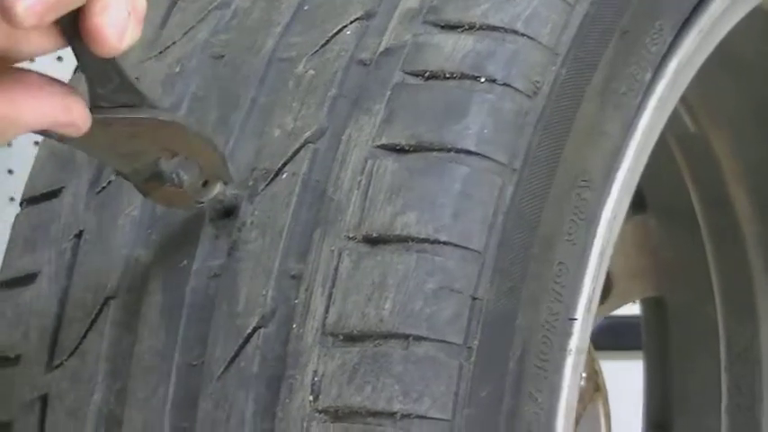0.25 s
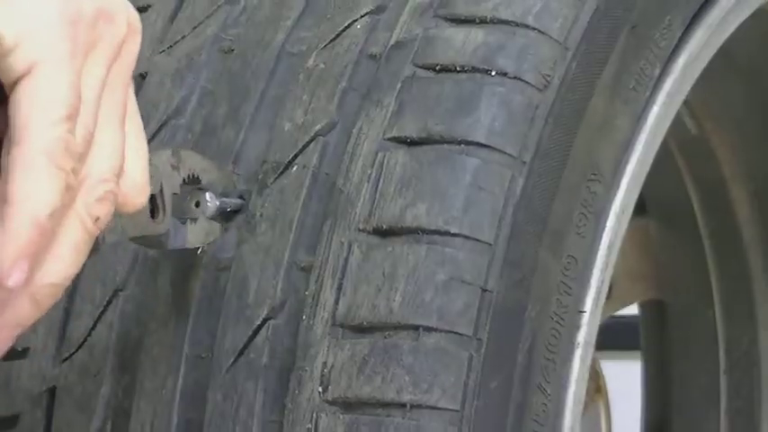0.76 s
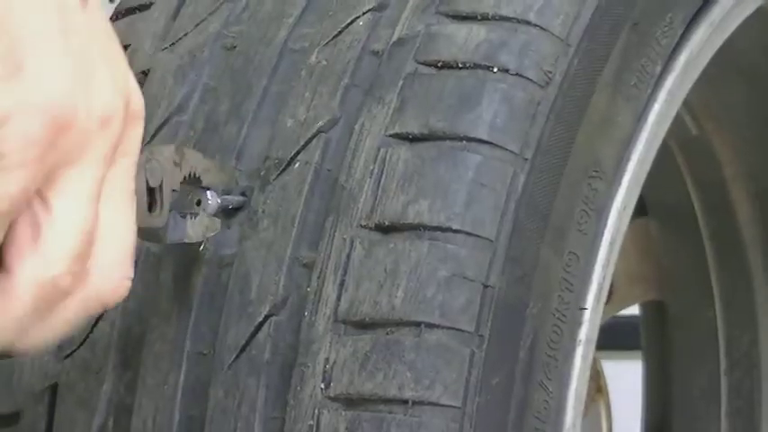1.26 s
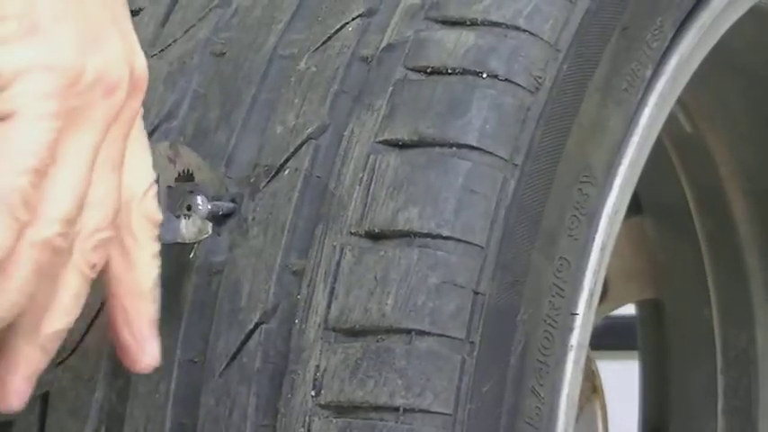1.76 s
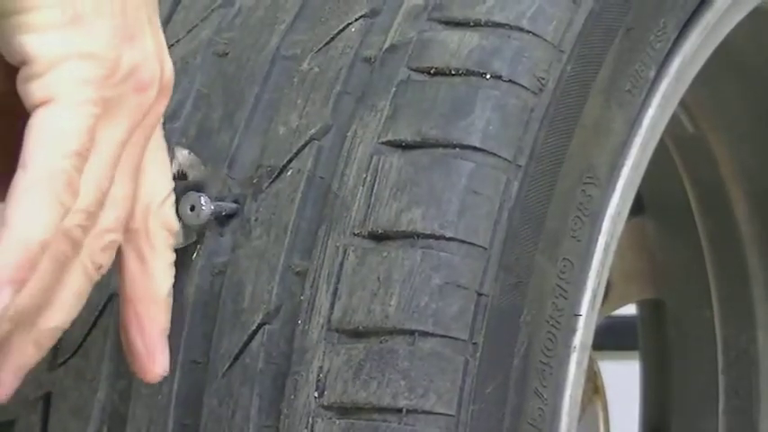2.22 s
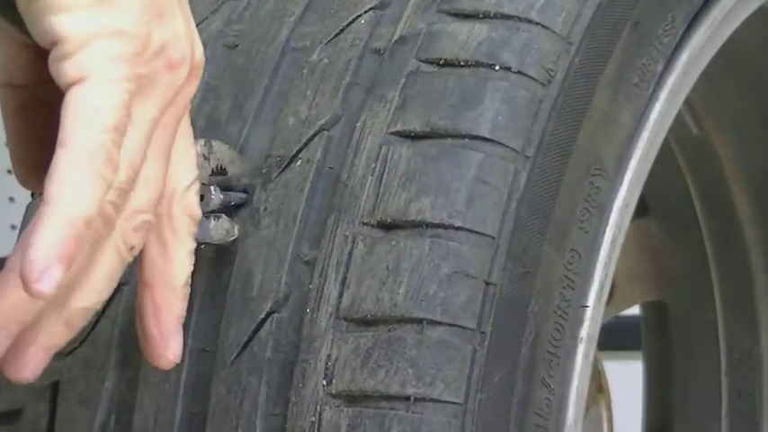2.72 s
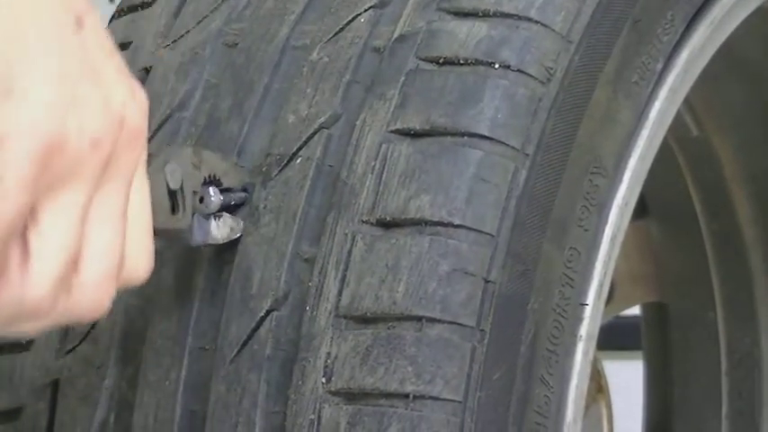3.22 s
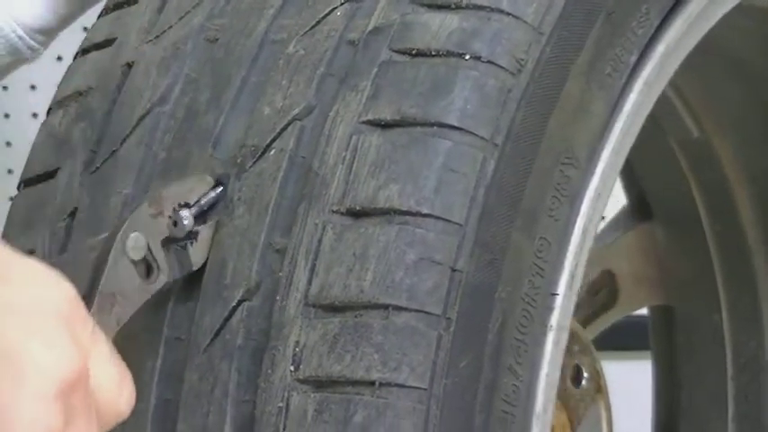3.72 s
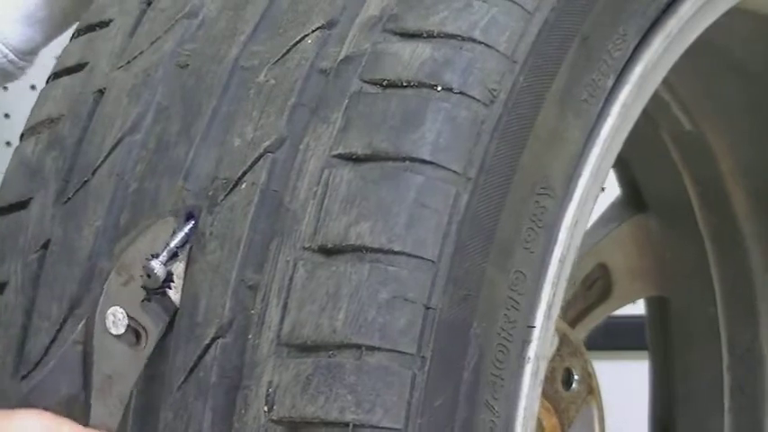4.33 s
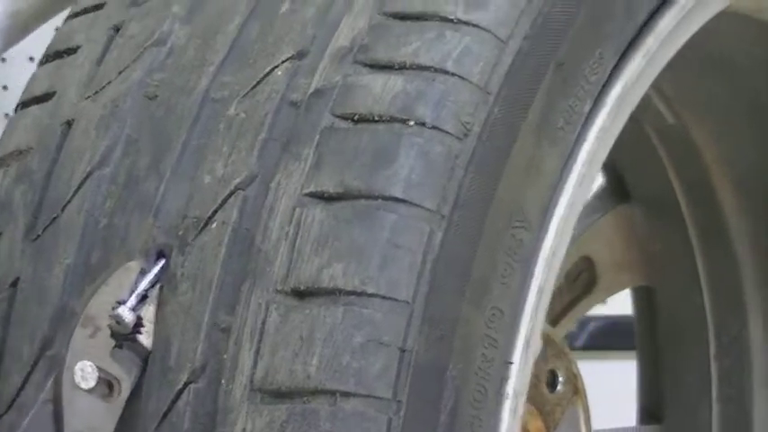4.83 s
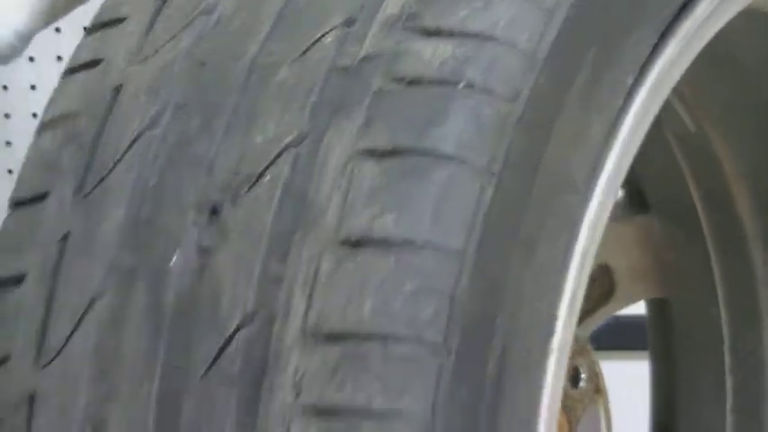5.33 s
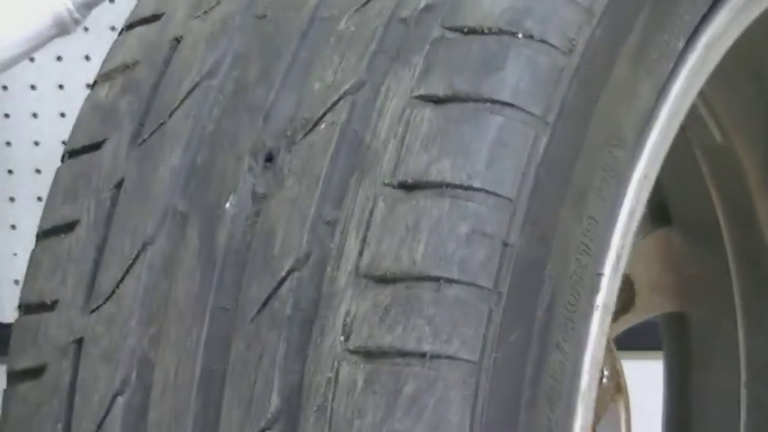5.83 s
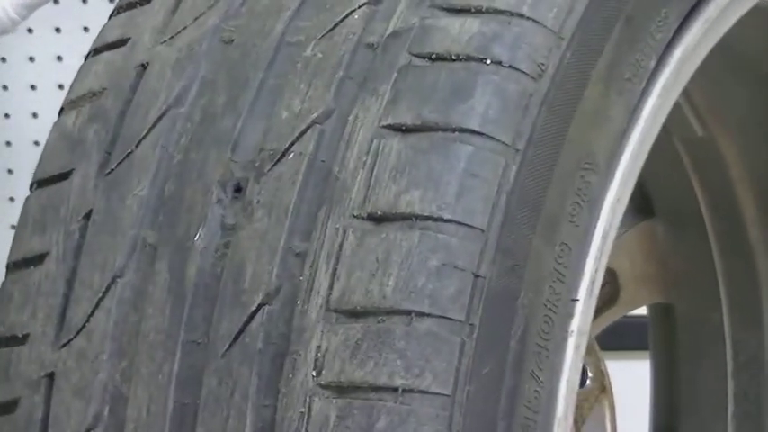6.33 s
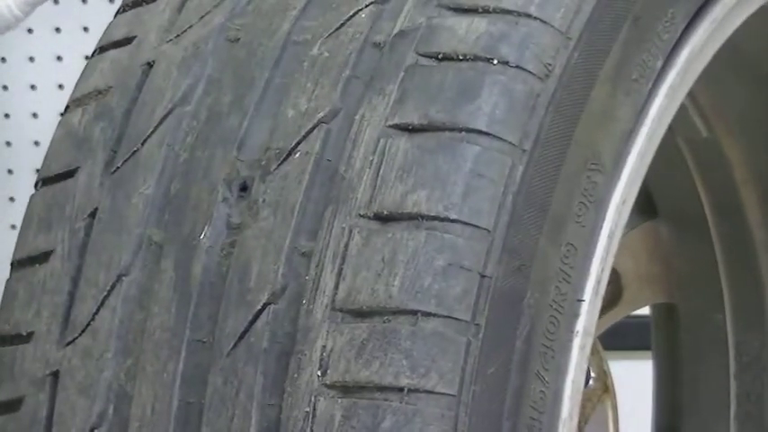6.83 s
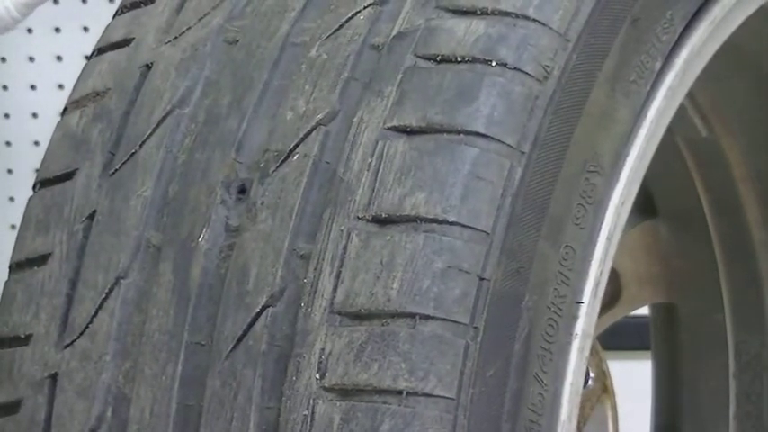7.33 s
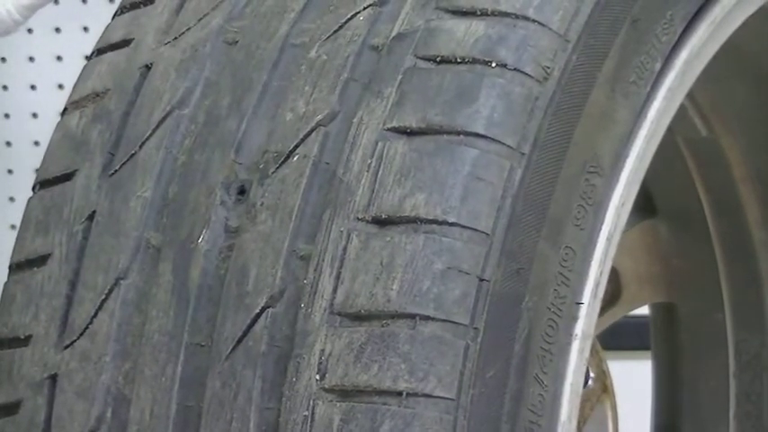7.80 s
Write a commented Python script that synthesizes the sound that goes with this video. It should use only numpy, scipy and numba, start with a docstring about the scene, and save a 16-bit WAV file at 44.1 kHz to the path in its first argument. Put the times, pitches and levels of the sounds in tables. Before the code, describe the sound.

For the first three seconds, pliers work a screw in a car tyre: faint rubbing, irregular steel clicks and soft, hollow knocks on rubber, over a quiet workshop fan whine and barely audible ticking. At about 2.3 seconds a thin, high whistle starts, climbs and frays into a faint seep by 3.2. Two tiny rubber creaks come near 3.5, then two sharp snaps around 3.7 as a sputtering hiss builds. From 4 to 4.6 the screw thread gives small dry ticks and scrapes, and the hiss becomes smoother. At 5.2 the screw pops out with a thump and a burst of air. A loud, bright, steady hiss follows and lasts to the end, at about 8 seconds. Between 7.4 and 7.8 the pliers bounce and clatter loudly onto a bench, briefly dipping the hiss. The sound is close and centred, with a short room echo.

```python
"""Pliers twist a screw out of a car tyre, over a workshop's fan whine and a faint ticking.
Friction stirs the tread, and impacts of the slipping jaws excite the modes of steel and casing.
Air squeals past the thread, then seeps, while the rubber creaks and snaps by stick-slip.
The screw pops free, and the turbulent jet from the open hole hisses at full strength.
Last, the pliers clatter onto the bench, and a limiter ducks the hiss under the blows."""
import sys
import numpy as np
from scipy import signal
from scipy.fft import rfft, irfft
from scipy.io import wavfile
from scipy.ndimage import uniform_filter1d
from numba import njit

SR = 44100
rng = np.random.default_rng(int(sys.argv[2]) if len(sys.argv) > 2 else 0)


def generate_wav(sig):
    """Save sig (samples, or channels by samples) to the path in sys.argv[1] as 16-bit PCM at SR."""
    pcm = np.round(np.clip(np.atleast_2d(sig).T, -1, 1) * 32767).astype(np.int16)
    wavfile.write(sys.argv[1], SR, pcm)


N = 355357
TIME = np.arange(N) / SR
HIT = np.arange(int(.8 * SR)) / SR  # time axis of one impact [s]


def undb(db):
    """Decibels to amplitude ratio."""
    return 10 ** (np.asarray(db) / 20)


def unit(x):
    """Normalisation to an rms of 1."""
    return x / np.sqrt(np.mean(x ** 2))


def unit_energy(x):
    """Normalisation to an energy of 1."""
    return x / np.sqrt(np.sum(x ** 2))


def ramp(s, length_s):
    """Linear rise from 0 to 1, starting at s."""
    return np.clip((TIME - s) / length_s, 0, 1)


def swell(s, attack_s, hold_s, release_s):
    """Trapezoidal envelope."""
    return ramp(s, attack_s) - ramp(s + attack_s + hold_s, release_s)


def walk(rate_hz):
    """Smooth random modulation of rms 1."""
    step = max(int(SR / rate_hz), 1)
    stairs = np.repeat(rng.standard_normal(N)[:N // step + 1], step)
    return unit(uniform_filter1d(stairs, step))[:N]


def over_hz(points, hz):
    """Interpolation on a logarithmic frequency axis."""
    f, value = np.transpose(points)
    return np.interp(np.log(hz + 1), np.log(f), value)


def colour(x, spectrum, size=2048):
    """Minimum-phase filter, made by folding the cepstrum of the spectrum."""
    cepstrum = irfft(np.log(undb(over_hz(spectrum, np.fft.rfftfreq(size, 1 / SR)))))
    cepstrum[1:size // 2] *= 2
    cepstrum[size // 2 + 1:] = 0
    return signal.fftconvolve(x, irfft(np.exp(rfft(cepstrum))))[:len(x)]


def noise(spectrum):
    """Filtered Gaussian noise of rms 1."""
    return unit(colour(rng.standard_normal(N), spectrum))


def resonance(x, hz, width_hz):
    """Second-order resonator with gain 1 at its centre."""
    return signal.lfilter(*signal.iirpeak(hz, hz / width_hz, fs=SR), x)


def contact(scuff, scuff_s):
    """Contact force: an impulse, then a decaying scuff of micro-slips."""
    grit = rng.standard_normal(len(HIT)) * np.exp(-HIT / scuff_s)
    return signal.unit_impulse(len(HIT)) + scuff * unit_energy(grit)


def ring(force, modes):
    """Modal superposition: a force drives damped modes, which radiate little below their own pitch."""
    response = sum(undb(db) * np.cos(2 * np.pi * hz * HIT) * np.exp(-np.log(1000) * HIT / t60)
                   for hz, db, t60 in modes)
    pitches = [hz for hz, _, _ in modes]
    band_hz = [min(pitches) / 2, min(2 * max(pitches), SR / 3)]
    response = signal.sosfilt(signal.butter(2, band_hz, "band", fs=SR, output="sos"), response)
    return signal.fftconvolve(force, unit_energy(response))[:len(HIT)]


def add(track, s, sound, db, echo, size):
    """Superposition of a hit and its echo; db sets their rms over the first size samples."""
    heard = sound + signal.fftconvolve(sound, echo)[:len(sound)]
    heard = heard * undb(db) / np.sqrt(np.mean(heard[:size] ** 2))
    start = int(s * SR)
    track[start:start + len(heard)] += heard[:N - start]


# reverberation of the workshop (frequency [Hz], T60 [s])
REVERB_TIMES = [(100, 0.63), (250, 0.39), (500, 0.51), (1200, 0.43), (2000, 0.5), (3000, 0.46),
                (7000, 0.51), (15000, 0.2)]
def room_tail(build_s):
    """Diffuse field of unit energy: it builds up, then decays exponentially, the top treble first."""
    hz, _, cells = signal.stft(rng.standard_normal(len(HIT)), SR, nperseg=256)
    age = np.linspace(0, HIT[-1], cells.shape[1])
    decay = np.exp(-np.log(1000) * age / over_hz(REVERB_TIMES, hz)[:, None])
    tail = signal.istft(cells * decay)[1][:len(HIT)]
    return unit_energy(tail * (1 - np.exp(-HIT / build_s)))


# workshop background (frequency [Hz], level [dB])
SHOP_SPECTRUM = [(30, -38), (110, -22), (250, -10), (320, -6), (560, -3.5), (900, -4.5), (1550, -7),
                 (1950, -6.5), (2250, 4), (2550, -0.5), (3000, -10.5), (5000, -13), (12500, -14),
                 (15500, -21)]
def workshop(level_db=-55):
    """Ambient noise: a broad spectrum with a narrow peak, the whine of a fan."""
    return noise(SHOP_SPECTRUM) * undb(level_db + .5 * walk(6))


def ticking(level_db=-68, rate_hz=30):
    """Periodic excitation: even impulses drive the resonances of a small mechanism."""
    ticks = np.diff(np.floor(TIME * rate_hz), prepend=0) * undb(1.3 * walk(20))
    return unit(resonance(resonance(ticks, 890, 230), 910, 330)) * undb(level_db)


# modes of the inflated tyre, the lowest from its air ring (frequency [Hz], level [dB], T60 [s])
CASING_MODES = [(180, -27, 0.14), (241, -14.5, 0.29), (254.4, -1.5, 0.21), (332, -4, 0.15),
                (357.7, -2.5, 0.28), (391.7, -1, 0.22), (717, -10, 0.034)]
# rebounding tread (frequency [Hz], level [dB])
REBOUND_SPECTRUM = [(40, -24), (130, -15), (185, -5), (250, 4.5), (310, 0), (400, 1), (900, -0.5),
                    (1700, 2), (2000, -11), (2800, -18), (5000, -45), (15000, -58)]
# rubbing on the tread (frequency [Hz], level [dB])
RUB_SPECTRUM = [(60, -18), (200, -18), (400, -6), (1300, 1.5), (3000, -5), (5000, -12.5), (6800, -9.5),
                (10000, -15), (12500, -12), (15000, -24)]
# strokes of hand and pliers (time [s], hold [s], rubbing level [dB], rumble level [dB])
HAND_STROKES = [(-.05, 0.033, -51.5, -70), (0.184, 0.19, -49.5, -68), (0.472, 0.2, -54.5, -62),
                (1.15, 0.13, -60, -64), (1.8, .05, -56, -57), (3.87, .06, -46, -42), (4.15, .12, -53, -60)]
def brush(grain_db=1.5, attack_s=0.048, release_s=0.094):
    """Friction noise: skin and steel catch unevenly on the tread and stir the casing into a rumble."""
    rub = noise(RUB_SPECTRUM) * undb(grain_db * walk(200))
    casing = ring(signal.unit_impulse(len(HIT)), CASING_MODES)
    rumble = unit(signal.fftconvolve(noise(REBOUND_SPECTRUM), casing)[:N])
    return sum(swell(s, attack_s, hold_s, release_s) * (undb(rub_db) * rub + undb(rumble_db) * rumble)
               for s, hold_s, rub_db, rumble_db in HAND_STROKES)


# modes of the jaws (frequency [Hz], level [dB], T60 [s])
STEEL_MODES = [(5940, 16, 0.063), (5990, -4, 0.19), (6900, -15, .14), (6840, -17, .14), (8600, -12, .08),
               (9200, -6, .08)]
# sharp contact (frequency [Hz], level [dB])
CLICK_SPECTRUM = [(500, -35), (2200, 4.5), (4200, 5), (4900, -3), (6000, 15), (7500, 5.5), (12000, -3),
                  (15000, -25)]
# blow on rubber (frequency [Hz], level [dB])
KNOCK_SPECTRUM = [(40, -13), (150, -15.5), (500, 2.5), (800, 1.5), (1200, 4.5), (1800, -2.5), (2500, -8.5),
                  (3300, -11), (5000, -17.5), (15000, -82)]
# slips on the screw head (time [s], thud level [dB], knock level [dB], click level [dB])
JAW_SLIPS = [(0.535,-70,-54,-53), (0.618,-63,-55,-37.5), (0.739,-55,-44.5,-51.5), (0.759,-45.5,-51,-64),
             (0.981,-49.5,-49,-56.5), (1.116,-51,-44.5,-50.5), (1.359,-54,-55,-68), (1.518,-44.5,-46.5,-60),
             (2.021,-46.5,-46,-70), (2.069,-52.5,-53,-59), (2.322,-64,-58,-47), (2.469,-54,-46,-62),
             (2.719,-75,-54,-60), (2.905,-56,-51,-56), (2.95,-52.5,-54,-63)]
def slips(room, spread_db=0.5):
    """Impact excitation: each slip clicks the jaws, knocks the tread and sets the casing ringing."""
    out = np.zeros(N)
    for s, thud_db, knock_db, click_db in JAW_SLIPS:
        force = contact(scuff=1.0, scuff_s=0.0069)
        tick = contact(scuff=2.9, scuff_s=0.0037)
        steel = colour(tick, CLICK_SPECTRUM) + undb(-5) * ring(tick, STEEL_MODES)
        # each blow lands on another spot, which shifts the balance of the modes
        modes = [(hz, db + spread_db * rng.standard_normal(), t60) for hz, db, t60 in CASING_MODES]
        add(out, s, ring(force, modes), thud_db, undb(-2) * room, size=2600)
        add(out, s, colour(force, KNOCK_SPECTRUM), knock_db, room, size=1300)
        add(out, s, steel, click_db, undb(-8.5) * room, size=660)
    return out


# jet through the gap round the screw's tip (frequency [Hz], level [dB])
GAP_SPECTRUM = [(100, -40.5), (600, -22), (1600, -14.5), (3000, -15.5), (5000, -10.5), (7400, -6.5),
                (8300, -1), (8900, -3), (10000, 0), (12500, 0.5), (14000, -3.5), (15500, -7.5)]
# whistle during one turn of the screw (time [s], frequency [Hz])
SQUEAL_PITCH = [(2.36, 4460), (2.46, 4620), (2.63, 5020), (2.73, 4820), (2.85, 4870), (2.95, 5520),
                (3.04, 7100)]
def squeal(start_s=2.315, hold_s=0.825, accent_db=9.5, settle_s=0.23, seep_db_per_s=21):
    """Flow-excited tone: a whistle at the rubber lip climbs and frays to hiss until the thread seals."""
    hz = np.interp(TIME, *np.transpose(SQUEAL_PITCH))
    age = np.clip(TIME - start_s, 0, hold_s)
    # turbulence jostles the phase, which widens the spectral line
    width_hz = 173 * (hz / 4500) ** 6.6
    jitter = np.sqrt(2 * np.pi * width_hz / SR) * uniform_filter1d(rng.standard_normal(N), size=12)
    phase = np.cumsum(2 * np.pi * hz / SR + jitter)
    tone = unit(np.sin(phase) + undb(-6) * np.sin(2 * phase))
    whistle = tone * undb(-64 + accent_db * np.exp(-age / settle_s) + 2.5 * walk(150))
    seep = noise(GAP_SPECTRUM) * undb(-71.5 + seep_db_per_s * age)
    return (whistle + seep) * swell(start_s, attack_s=0.012, hold_s=hold_s, release_s=0.069)


# pulls on the screw (time [s], duration [s], level [dB], opening [0 slit, 1 gap, 2 free hole])
SCREW_PULLS = [(3.33, 0.12, -53.5, 1.7), (3.52, 0.35, -33, .15), (4.2, .03, -29, 0.16),
               (4.33, 0.45, -32.5, 1.02), (5.184, .1, -19, 1.64)]
def puncture():
    """Quasi-steady flow: each pull moves the leak to a level and opening that hold until the next."""
    level_db, opening = -80, 1.4  # still plugged by the screw
    for s, duration_s, new_db, new_opening in SCREW_PULLS:
        progress = ramp(s, duration_s)
        level_db += progress * (new_db - level_db)
        opening += progress * (new_opening - opening)
    return level_db, opening


# jet through the slit along the thread (frequency [Hz], level [dB])
SLIT_SPECTRUM = [(100, -61), (1000, -8.5), (3000, -8.5), (5300, -9), (6100, -8), (7000, -2.5), (8100, -9),
                 (9500, 5), (12000, 10), (13500, 6.5), (15500, 4)]
# jet through the free hole (frequency [Hz], level [dB])
HOLE_SPECTRUM = [(50, -55), (200, -56), (500, -31.5), (1100, -19.5), (1600, -11), (2900, -9), (4150, -5),
                 (5300, -7.5), (6100, -4), (7600, -2), (9500, 1), (11800, -0.5), (13100, -3), (14400, -11)]
# resonances of the channel through the tread (frequency [Hz], bandwidth [Hz], gain [dB])
CHANNEL_MODES = [(4260, 470, -17), (5960, 140, -4.5), (6880, 92, -3.5), (9170, 120, -11), (10100, 130, -8),
                 (11200, 250, -5.5), (13200, 180, -14), (15030, 290, -17)]
# spits of the jet (time [s], level [dB])
JET_SPITS = [(3.939, -27), (4.24, -29), (4.569, -30)]
def leak(room, flutter_db=0.71, sputter_db=1.2, surge_db=0.8):
    """Turbulent jet noise: it sputters and surges in the tight slit and gains lower hiss as it opens."""
    level_db, opening = puncture()
    hole = noise(HOLE_SPECTRUM)
    channel = sum(undb(db + 2.4 * walk(17)) * resonance(hole, hz, width)
                  for hz, width, db in CHANNEL_MODES)
    hisses = noise(SLIT_SPECTRUM), noise(GAP_SPECTRUM), unit(hole + channel)
    # equal-power crossfade from slit to gap to hole
    jet = sum(np.sqrt(np.clip(1 - abs(opening - k), 0, 1)) * hiss for k, hiss in enumerate(hisses))
    tight = np.clip(1 - opening, 0, 1)
    jet *= undb(level_db + (flutter_db + sputter_db * tight) * walk(45) + surge_db * tight * walk(12))
    jet += undb(-12) * signal.fftconvolve(jet, room)[:N]
    for s, db in JET_SPITS:
        spit = colour(contact(scuff=4, scuff_s=0.0023), SLIT_SPECTRUM)
        add(jet, s, spit, db, undb(-19) * room, size=400)
    return jet


# chirps of the tight rubber (time [s], frequency [Hz], level [dB])
RUBBER_CREAKS = [(3.477, 2230, -49), (3.521, 1930, -45)]
def creaks(room, width_hz=260):
    """Stick-slip friction: each slip of the thread briefly excites a resonance of the rubber."""
    out = np.zeros(N)
    for s, hz, db in RUBBER_CREAKS:
        force = contact(scuff=1.4, scuff_s=0.0044)
        chirp = resonance(resonance(force, hz, width_hz), hz, 4 * width_hz)
        add(out, s, chirp, db, undb(-7) * room, size=500)
    return out


# modes of the tread round the puncture (frequency [Hz], level [dB], T60 [s])
PUNCTURE_MODES = [(596, -2, 0.24), (980, -11, 0.075), (1160, 6.5, 0.073), (1285, 1, 0.046), (1700, -7, 0.1),
                  (2297, -4, 0.055)]
# snapping tread (frequency [Hz], level [dB])
TREAD_SPECTRUM = [(40, -22), (120, -16.5), (300, -14), (550, 0), (800, -6), (1150, 5.5), (1500, -4),
                  (1900, -5), (2600, -12.5), (3300, -23.5), (5000, -18), (15000, -53)]
# crack of air (frequency [Hz], level [dB])
CRACK_SPECTRUM = [(500, -34), (2500, 0), (4300, -2), (5300, -6.5), (6500, 3.5), (9500, 1.5), (12000, -3),
                  (15000, -28)]
# jumps of the thread (time [s], thud level [dB], knock level [dB], crack level [dB])
THREAD_SNAPS = [(3.68, -40.5, -25.5, -28), (3.745, -32.5, -13.5, -20.5), (3.91, -46, -38, -56)]
def snaps(room):
    """Elastic release: stretched rubber frees the thread; air cracks, tread knocks and casing thuds."""
    out = np.zeros(N)
    for s, thud_db, knock_db, crack_db in THREAD_SNAPS:
        force = contact(scuff=1.0, scuff_s=0.0025)
        tread = colour(force, TREAD_SPECTRUM) + undb(-23) * ring(force, PUNCTURE_MODES)
        crack = colour(contact(scuff=4.2, scuff_s=0.0045), CRACK_SPECTRUM)
        add(out, s, ring(force, CASING_MODES), thud_db, undb(9) * room, size=2600)
        add(out, s, tread, knock_db, undb(-2) * room, size=1300)
        add(out, s, crack, crack_db, undb(-4.5) * room, size=660)
    return out


# ridges of the screw sliding out (time [s], scrape level [dB], tick level [dB])
RIDGE_FLICKS = [(4.042, -52, -43), (4.079, -47.5, -43), (4.166, -42.5, -50), (4.226, -43.5, -48),
                (4.283, -41, -50), (4.316, -52, -42), (4.361, -58, -37.5), (4.38, -59, -37),
                (4.569, -62, -39.5), (4.599, -46, -48)]
def flicks(room, lip_hz=1100, width_hz=1300):
    """Plucking: each ridge scrapes the rubber lip and lets it spring back with a dry tick."""
    out = np.zeros(N)
    for s, scrape_db, tick_db in RIDGE_FLICKS:
        force = contact(scuff=2.5, scuff_s=.009)
        scrape = resonance(resonance(force, lip_hz, width_hz), lip_hz, width_hz)
        tick = colour(contact(scuff=1.7, scuff_s=0.0016), CLICK_SPECTRUM)
        add(out, s, scrape, scrape_db, undb(-3) * room, size=1300)
        add(out, s, tick, tick_db, undb(-10) * room, size=660)
    return out


# exit of the screw and rebounds of the tread (time [s], thump level [dB], burst level [dB])
SCREW_EXIT = [(5.24, -19, -15.5), (5.258, -30.5, -40), (5.378, -37, -50)]
def pop(room):
    """Pressure release: the screw leaves like a cork, with a burst of air and a thump of the tread."""
    out = np.zeros(N)
    for s, thump_db, burst_db in SCREW_EXIT:
        thump = colour(contact(scuff=0.66, scuff_s=0.0044), REBOUND_SPECTRUM)
        burst = colour(contact(scuff=5.7, scuff_s=0.0032), CRACK_SPECTRUM)
        add(out, s, thump, thump_db, undb(4.5) * room, size=1300)
        add(out, s, burst, burst_db, undb(-21) * room, size=660)
    return out


# modes of the bench top (frequency [Hz], level [dB], T60 [s])
BENCH_TOP_MODES = [(136, -20, 0.22), (255, -13, 0.12), (400, 10.5, 0.12), (422, 0, 0.12), (480, -2, 0.11),
                   (611, 7, 0.12), (764, -22, .1)]
# rattling pliers (frequency [Hz], level [dB])
CLATTER_SPECTRUM = [(40, -24), (200, -31.5), (450, -11.5), (700, -2.5), (1000, 5), (1250, 1.5), (1750, -1),
                    (2200, -9), (2900, -20), (6000, -25), (15000, -42)]
# pliers and screw landing (time [s], thud level [dB], clatter level [dB])
BENCH_IMPACTS = [(7.359, -50.5, -44.5), (7.494, -34.5, -26.5), (7.546, -29, -14), (7.556, -12, -28),
                 (7.598, -33, -27), (7.669, -43, -14), (7.692, -34, -10.5), (7.706, -35, -19),
                 (7.733, -36, -23.5)]
def landings(room):
    """Repeated impact: each bounce of the pliers excites the bench's modes and rattles their joint."""
    out = np.zeros(N)
    for s, thud_db, clatter_db in BENCH_IMPACTS:
        thud = ring(contact(scuff=0.58, scuff_s=0.0034), BENCH_TOP_MODES)
        clatter = colour(contact(scuff=1.8, scuff_s=0.0077), CLATTER_SPECTRUM)
        add(out, s, thud, thud_db, undb(-9.5) * room, size=1800)
        add(out, s, clatter, clatter_db, undb(-3) * room, size=1300)
    return out


# side signal of the knocks (frequency [Hz], gain [dB])
KNOCK_SIDE_GAIN = [(250, -50), (800, -25), (1300, -26.5), (4000, -20), (8000, -38), (13000, -30)]
# side signal of the escaping air (frequency [Hz], gain [dB])
AIR_SIDE_GAIN = [(300, -40), (1800, -68), (3300, -21.5), (5700, -27), (7500, -56), (14000, -44)]
def scene():
    """Mid-side stereo: all sources lie straight ahead; early echoes and background add slight width."""
    room = room_tail(build_s=0.0031)
    knocks = (slips(room) + flicks(room) + snaps(room) + pop(room)
              + creaks(room) + landings(room) + brush())
    air = leak(room) + squeal()
    mid = knocks + air + ticking() + workshop()
    early_echo = unit_energy(room_tail(build_s=0.00088) * np.exp(-HIT / 0.0018))
    side = colour(knocks, KNOCK_SIDE_GAIN) + colour(air, AIR_SIDE_GAIN)
    ambience = noise([(40, -13), (250, -3), (700, 4), (1500, -2.5), (2400, -3), (4000, -3.5), (8000, -27)])
    side = signal.fftconvolve(side, early_echo)[:N] + undb(-68.5) * ambience
    return np.array([mid + side, mid - side])


@njit
def follow(x, attack, release):
    """One-pole envelope follower with separate rates of rise and fall."""
    out, level = np.empty(len(x)), 0.
    for i in range(len(x)):
        level += (x[i] - level) * (attack if x[i] > level else release)
        out[i] = level
    return out


def record(dry, limit_db=-14, attack_s=0.0031, release_s=0.02, top_hz=15550):
    """Limiting: the gain falls under loud blows; saturation rounds the peaks and a low-pass follows."""
    envelope = follow(np.abs(dry[0] + dry[1]) / 2, 1 / (attack_s * SR), 1 / (release_s * SR))
    gain = np.maximum(envelope / undb(limit_db), 1) ** -.8
    rounded = 1.3 * np.tanh(dry * gain / 1.3)
    return signal.sosfilt(signal.ellip(10, .2, 70, top_hz, fs=SR, output="sos"), rounded)


dry = scene()
out = record(dry)
generate_wav(out)
```